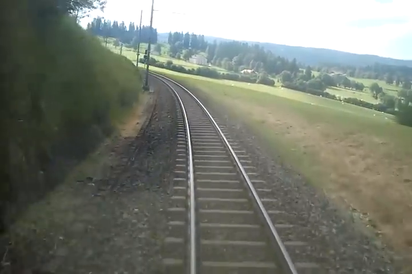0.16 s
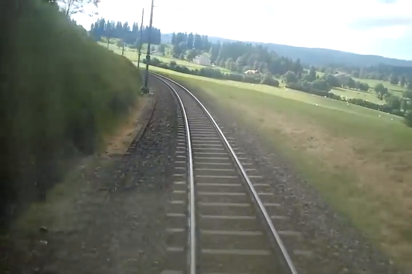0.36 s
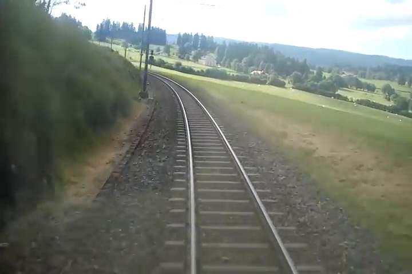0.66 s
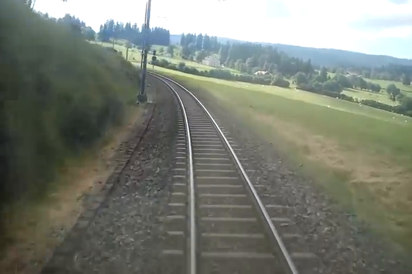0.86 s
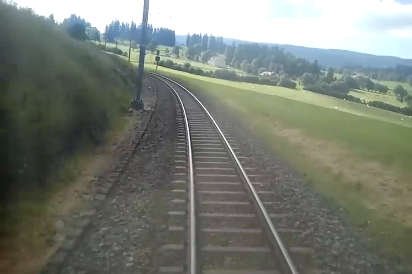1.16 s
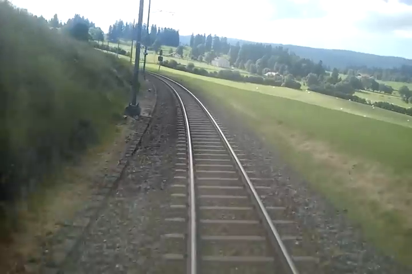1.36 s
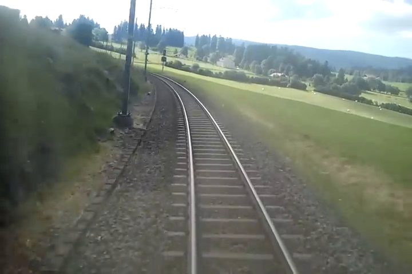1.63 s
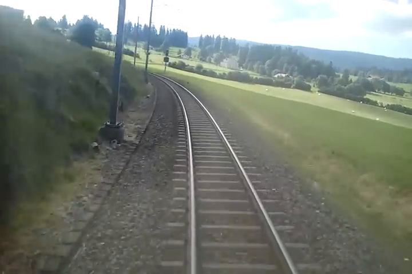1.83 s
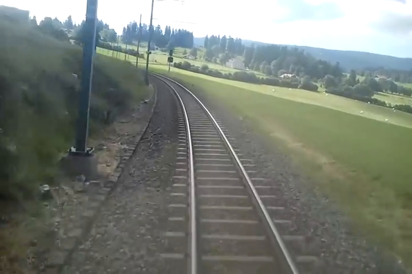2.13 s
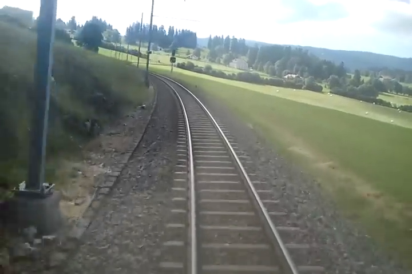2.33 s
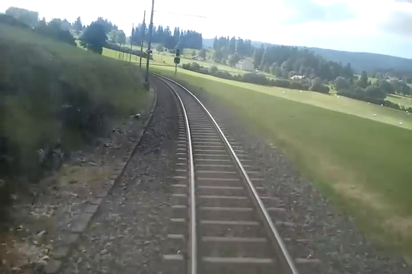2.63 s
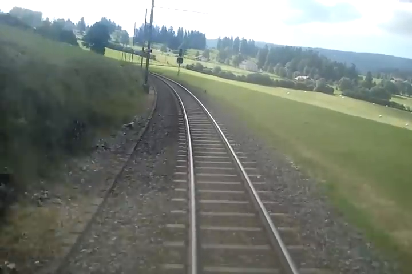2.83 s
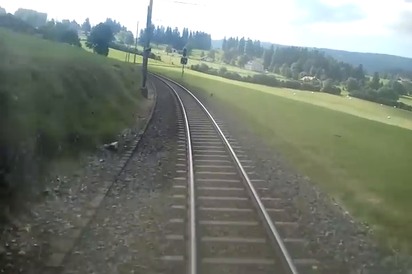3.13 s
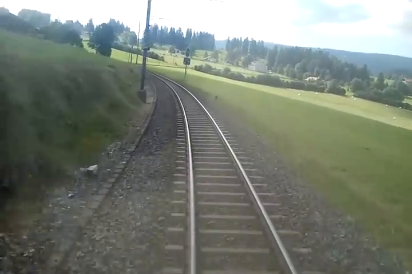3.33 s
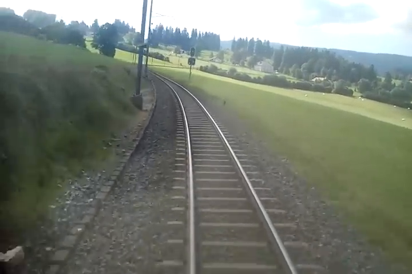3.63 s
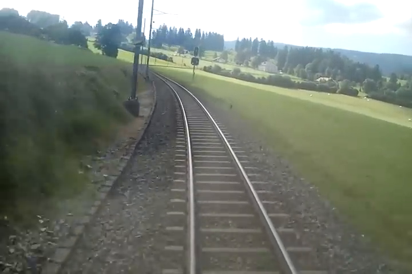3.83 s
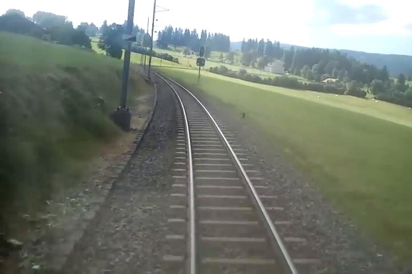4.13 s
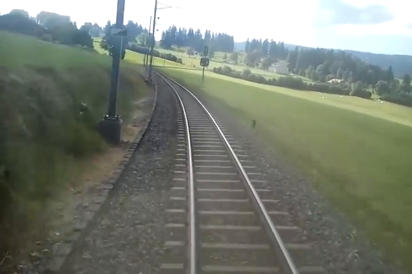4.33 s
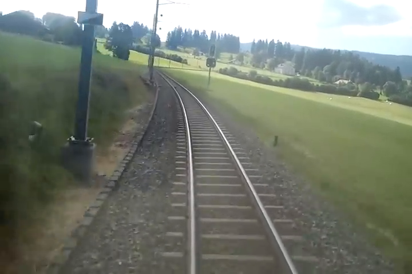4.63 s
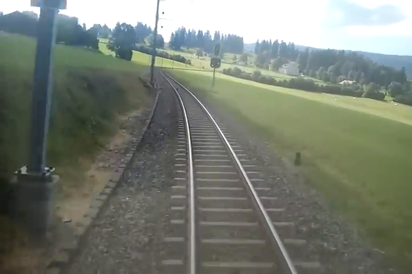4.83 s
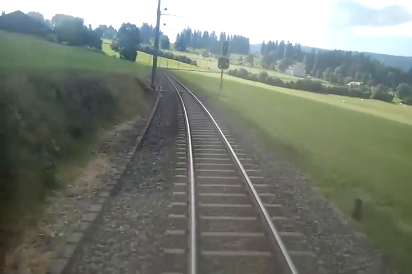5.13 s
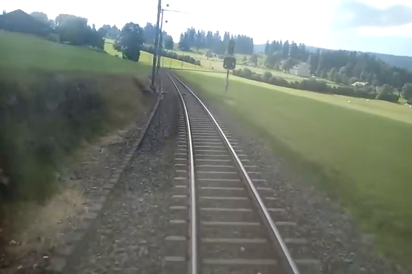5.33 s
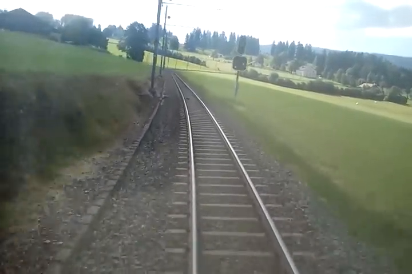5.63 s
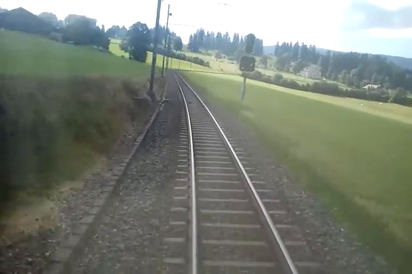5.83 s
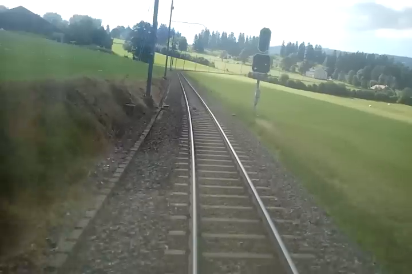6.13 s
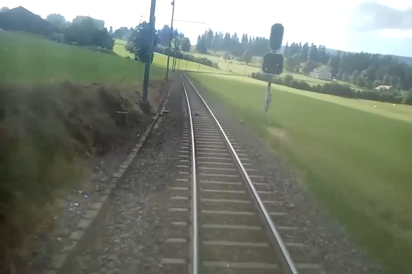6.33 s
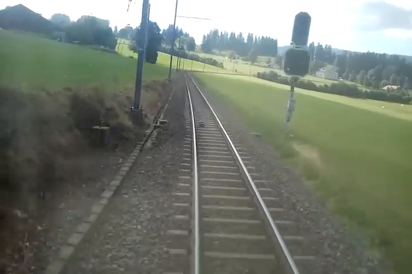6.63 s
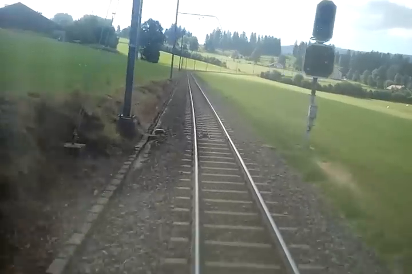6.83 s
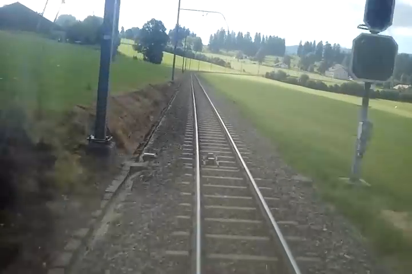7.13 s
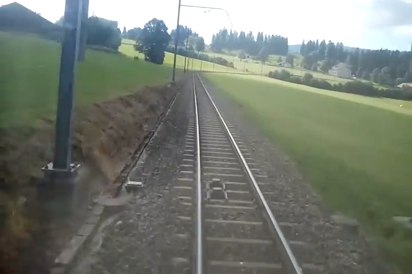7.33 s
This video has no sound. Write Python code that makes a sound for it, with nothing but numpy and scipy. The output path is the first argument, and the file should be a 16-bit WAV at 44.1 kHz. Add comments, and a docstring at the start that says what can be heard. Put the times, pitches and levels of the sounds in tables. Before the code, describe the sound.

In the driver's cab of an electric railcar, low boomy wheel rumble and faint motor hum continue throughout. After a few light flange scrapes, one loud, high air whistle sounds for under a second and echoes off the surroundings. Then the curve brings steely hissing, flickering high squeals, a metallic knock, one strong piercing squeal with a burst of air, and low groaning grinds. Microphone inside the cab, centred.

```python
"""Wheel rumble through the car body is heard first, in the cab of an electric railcar rounding a curve.
Filtered noise and two hum tones make it; noise rubs for the flanges, and wavering tones squeal for the wheels.
The air whistle, a gliding harmonic tone, blows once, and reflectors return it Doppler-shifted, mostly upward.
In the curve two low wheel modes groan, the rail is struck once, and a shaped noise burst lets off air.
"""
import sys
import numpy as np
from scipy import signal
from scipy.fft import rfft, irfft, next_fast_len
from scipy.io import wavfile
from scipy.ndimage import uniform_filter1d

SR = 44100
rng = np.random.default_rng(int(sys.argv[2]) if len(sys.argv) > 2 else 0)


def put_to_file(sound):
    """Save the sound as 16-bit audio at rate SR, in the file named by the first command-line argument."""
    columns = np.atleast_2d(sound).T  # one column per channel
    safe = np.clip(columns, -1, 1)
    whole_steps = np.round(safe * 32767)
    wavfile.write(sys.argv[1], SR, whole_steps.astype(np.int16))


N = 329427
TIME = np.arange(N) / SR
CUTOFF_HZ = 15730   # upper limit of the sound
SPEED_M_S, SOUND_M_S = 13, 343   # speed of the railcar; speed of sound


def amp(db):
    """Logarithmic level: dB to amplitude gain."""
    return 10 ** (np.asarray(db) / 20)


def rms_one(x):
    """Normalisation: scale to rms 1."""
    return x / np.sqrt(np.mean(x ** 2) + 1e-20)


def in_time(rows):
    """Linear interpolation: the columns of a curve at every sample."""
    times, *columns = np.transpose(rows)
    return [np.interp(TIME, times, column) for column in columns]


def while_on(rows, fade_s):
    """Gating: 1 during a curve, fading linearly to 0 outside it."""
    inside_s = np.minimum(TIME - rows[0][0], rows[-1][0] - TIME)
    return np.clip(inside_s / fade_s + 1, 0, 1)


def drift(rate_hz, size=N):
    """Low-pass random process: noise through two equal poles at rate_hz; spread 1."""
    r = np.exp(-16 * np.pi * rate_hz / SR)   # run at an eighth of the sample rate
    noise = rng.standard_normal(size // 8 + 3002)
    slow = signal.lfilter([1], [1, -2 * r, r * r], noise)[3000:]   # drop the start-up
    return np.interp(np.arange(size) / 8, np.arange(len(slow)), rms_one(slow))


def coloured(spectrum, lifts=()):
    """Spectral shaping: noise with a given spectrum and resonant lifts; rms 1."""
    size = next_fast_len(N)
    hz = np.arange(1, size // 2 + 2) * SR / size
    points = np.array(spectrum)
    db = np.interp(np.log(hz), np.log(points[:, 0]), points[:, 1], left=-120, right=-120)
    for centre, width, lift_db in lifts:
        db = db + lift_db / (1 + (2 * (hz - centre) / width) ** 2)
    return rms_one(irfft(rfft(rng.standard_normal(size)) * amp(db), size)[:N])


def resonate(x, hz, width_hz):
    """Damped resonance: one pole pair, gain 1 at its peak."""
    r = np.exp(-np.pi * width_hz / SR)
    poles = [1, -2 * r * np.cos(2 * np.pi * hz / SR), r * r]
    return signal.lfilter([(1 - r * r) / 2, 0, (r * r - 1) / 2], poles, x)


def band(x, low_hz, high_hz):
    """Band-pass filtering: one band of a sound; rms 1."""
    sos = signal.butter(3, [low_hz, high_hz], "band", fs=SR, output="sos")
    return rms_one(signal.sosfilt(sos, x))


def bursts(starts, holds, peaks_db, rise_db_s, fall_db_s):
    """Exponential growth and decay: dB ramps rise to each start, hold and fall; the loudest counts."""
    coarse = TIME[::16]
    level_db = np.full(len(coarse), -200.0)
    for start, hold, peak_db, rise in np.broadcast(starts, holds, peaks_db, rise_db_s):
        before_s = np.maximum(start - coarse, 0)
        after_s = np.maximum(coarse - start - hold, 0)
        level_db = np.maximum(level_db, peak_db - rise * before_s - fall_db_s * after_s)
    return np.interp(TIME, coarse, level_db)


# wheels on rail: (time [s], floor boom level [dB], middle rumble level [dB], upper rumble level [dB])
ROLLING = [(0.0, -8.5, -24, -30.5), (0.04, -16.5, -19, -29), (1.08, -17, -20, -31.5),
           (1.48, -12.5, -17.5, -28), (1.62, -15.5, -20.5, -32), (2.99, -17.5, -18, -30),
           (3.1, -18.5, -23, -30), (3.47, -14, -17.5, -29), (3.79, -16.5, -22, -31.5),
           (4.12, -17, -17.5, -28), (4.24, -19, -18.5, -29), (6.12, -19, -20, -31.5),
           (7.39, -16, -17, -28.5), (7.47, -53, -16, -29)]
# spectrum of the rumble: (frequency [Hz], relative density [dB per Hz])
RUMBLE_SPECTRUM = [(15, -27.5), (25, -14), (154, -12.5), (171, -11), (231, -5.5), (257, -3.5), (296, 0),
                   (372, -8.5), (400, -5.5), (521, -6.5), (559, -5.5), (644, -16), (1070, -20),
                   (1170, -31.5), (1700, -45.5), (2210, -42), (3740, -120)]
# car body resonances: (frequency [Hz], width [Hz], lift [dB])
BODY_MODES = [(43.4, 4.9, 5), (269.6, 20, 8), (324, 170, 4), (397.4, 8, 6.5), (558, 67, 3), (772, 14, 4)]
# deepest rumble: (time [s], level [dB])
DEEP_LEVEL = [(0, -28.5), (1.2, -30.5), (1.7, -27), (4.1, -28), (4.7, -29.5), (6.4, -31), (7.47, -25.5)]
# motor and gear hum: (frequency [Hz], mean level [dB])
HUM = [(182.6, -33), (43.3, -52.5)]
# spectrum of the tread on the rail: (frequency [Hz], relative density [dB per Hz])
TREAD_SPECTRUM = [(710, -33.5), (1200, 11.5), (1320, 3), (1980, -3.5), (2490, -10.5), (2700, -31),
                  (4370, -2.5), (5060, -39.5), (7000, -34.5), (9100, -64), (15400, -120)]
TREAD_HISS_DB = -41.5


def rumble():
    """Forced vibration: rail roughness shakes the car body in bands; the drive hums, the treads hiss."""
    boom_db, middle_db, upper_db = in_time(ROLLING)
    body = coloured(RUMBLE_SPECTRUM, BODY_MODES)
    low = amp(in_time(DEEP_LEVEL)[0]) * band(body, 22, 188.4)
    boom = amp(boom_db + 0.97 * drift(3.9)) * band(body, 211.4, 329.0)
    middle = amp(middle_db + 1.25 * drift(4.5)) * band(body, 400, 700)
    upper = amp(upper_db) * band(body, 802, 2700)
    hum = 0
    for hz, db in HUM:
        phase = 2 * np.pi * np.cumsum(hz + 0.65 * drift(2.1)) / SR
        hum = hum + amp(db + 3.5 * drift(8.3)) * np.sin(phase)
    tread_hiss = amp(TREAD_HISS_DB) * coloured(TREAD_SPECTRUM)
    return low + boom + middle + upper + hum + tread_hiss


# steady pressure of the flanges, light, then firm in the curve: (time [s], force level [dB])
RUBBING = [(0, -53.5), (0.7, -59), (1.3, -54), (1.5, -57.5), (2.3, -54.5), (3.08, -52), (3.45, -42.5),
           (4.1, -42.5), (4.7, -42.5), (4.85, -41.5), (5.34, -42), (5.44, -49), (5.56, -41), (6.15, -41.5),
           (6.2, -38), (6.6, -41.5), (7.17, -40.5), (7.215, -44.5), (7.25, -45), (7.47, -43)]
# moments of harder bite:
# (time [s], hold [s], rise [dB/s], force level [dB], sizzle level [dB], grind level [dB])
BITES = [(.27, 0.05, 300, -51, -54, -41), (0.668, 0.042, 298, -51.5, -78, -44),
         (0.887, 0.024, 298, -51.5, -69, -44), (2.127, 0.035, 297, -53, -79, -39.5),
         (0.462, 0.087, 248, -43.5, -42.5, -44), (1.306, 0.046, 155, -50, -55, -42),
         (2.754, 0.057, 200, -40, -45, -38), (3.223, 0.026, 400, -44.5, -39.5, -45),
         (3.463, 0.036, 296, -41.5, -44, -41), (4.095, 0.067, 400, -39.5, -37.5, -40),
         (4.345, 0.027, 2000, -35.5, -25.5, -33.5), (5.263, 0.099, 300, -41, -44, -39),
         (5.69, 0.097, 300, -36, -28.5, -28.5), (7, 0.036, 600, -39.5, -29, -33),
         (7.095, 0.049, 400, -37.5, -30.5, -32), (7.25, 0.067, 700, -40, -32, -35.5),
         (7.347, 0.095, 300, -40, -32.5, -29.5)]
# spectra of hiss, sizzle and grind: (frequency [Hz], relative density [dB per Hz])
RUB_SPECTRUM = [(650, -16), (1100, -4.5), (1630, -30), (1830, -8), (2130, -8.5), (2770, -2), (3510, -2.5),
                (4650, 0), (9000, -25), (11700, -72), (19800, -120)]
SIZZLE_SPECTRUM = [(4000, -13), (6000, 0.5), (8500, -3.5), (10500, -9.5), (13000, -13.5), (15900, -52.5)]
GRIND_SPECTRUM = [(900, -20.5), (1200, 3.5), (1800, -5), (2500, -8.5), (3500, -24)]
# wheel modes that the rubbing rings: (frequency [Hz], width [Hz], level before the contact gain [dB])
WHEEL_MODES = [(830, 30, -6), (1020, 40, -8), (1850, 50, -16), (2050, 40, -18), (2729, 30, -11),
               (3315, 60, -6.5), (3763, 50, -15), (4690, 60, -8), (4760, 40, -9), (4940, 200, -7),
               (5690, 40, -10), (5800, 500, -6), (7908, 40, -17), (8344, 40, -17)]
FIRM_DB, FORCE_WANDER_DB = -43, 1.5   # usual force in the curve; its random wander
BITE_FALL_DB_S = 216.5
HISS_DB = 8   # hiss above the force
SIZZLE_DB, SIZZLE_GROWTH = -41.5, 1.84   # at the usual force; dB gained for each dB of force
GRIND_DB, GRIND_GROWTH = -51, 3.5   # likewise
TOP_HZ, TOP_GROWTH = 10500, .9   # above this pitch: extra fade in dB for each dB of sizzle below -38 dB
SCRAPE_DB = .8   # fast roughness of the sliding contact
KNOCK_S = 4.354   # the flange strikes the rail once
KNOCK_DB = 32   # height of the strike above the rms of the noise that drives the wheel modes


def flanges():
    """Sliding friction: steel hisses, grinds, rings the wheel modes and sizzles when it bites harder."""
    steady_db, = in_time(RUBBING)
    starts, holds, rises, *peaks = np.transpose(BITES)
    bite_db, bright_db, dull_db = [bursts(starts, holds, db, rises, BITE_FALL_DB_S) for db in peaks]
    rub_db = np.maximum(steady_db + FORCE_WANDER_DB * drift(8.1), bite_db)
    sizzle_db = np.maximum(SIZZLE_DB + SIZZLE_GROWTH * (steady_db - FIRM_DB), bright_db)
    grind_db = np.maximum(GRIND_DB + GRIND_GROWTH * (steady_db - FIRM_DB), dull_db)

    flutter = amp(.7 * drift(10) + SCRAPE_DB * drift(45))
    hiss = amp(HISS_DB) * flutter * coloured(RUB_SPECTRUM)

    fizz = coloured(SIZZLE_SPECTRUM)
    lower = signal.sosfiltfilt(signal.butter(4, TOP_HZ, fs=SR, output="sos"), fizz)
    top_gain = amp(TOP_GROWTH * np.minimum(sizzle_db + 38, 0))
    sizzle = amp(sizzle_db + 2.4 * drift(12)) * (lower + top_gain * (fizz - lower))
    grind = amp(grind_db + SCRAPE_DB * drift(30)) * coloured(GRIND_SPECTRUM)

    contact = rng.standard_normal(N)
    contact[round(KNOCK_S * SR)] = amp(KNOCK_DB)
    rings = 0
    for hz, width, db in WHEEL_MODES:   # each mode is caught and let go on its own
        rings = rings + amp(db + 2.0 * drift(4.6)) * rms_one(resonate(contact, hz, width))
    # firm contact rings the wheel more
    ring_gain = amp(1.9 * (uniform_filter1d(rub_db, size=3000) + 39.0))
    return amp(rub_db) * (hiss + ring_gain * rings) + sizzle + grind


OCTAVE_DB = -31   # octave relative to the tone


def wavering(hz, level_db, flicker_db):
    """Stick-slip oscillation: a tone with its octave, unsteady in pitch and strength."""
    phase = 2 * np.pi * np.cumsum(hz * (1 + 0.000914 * drift(22.9))) / SR
    octave = amp(OCTAVE_DB) * np.sin(2 * phase) * (2 * hz < CUTOFF_HZ)
    return amp(level_db + flicker_db * drift(31)) * (np.sin(phase) + octave)


# wheel modes that lock into a tone, one row each: (frequency [Hz], close partner [Hz] if any)
SQUEAL_MODES = [(4760,), (5766,), (2729,), (3763,), (6665, 6756), (7634, 7725), (2045,), (1850,),
                (8565, 8662), (9582,), (4685,), (5690,)]
# squeals of each mode in turn: (time [s], hold [s], level before flicker [dB])
SQUEALS = [
    [(0.46, 0.07, -41), (2.755, 0.03, -44), (3.42, 0.24, -35), (3.66, 0.067, -28), (3.83, 0.051, -39),
     (4.15, .04, -32), (4.6, 0.091, -39), (4.82, .06, -27), (4.92, 0.035, -32), (5.14, 0.063, -31),
     (5.56, 0.044, -28), (5.75, .03, -25), (5.81, 0.16, -16.5), (6.03, 0.069, -28.5), (6.29, 0.038, -20.5),
     (6.68, 0.082, -34), (6.88, 0.034, -28)],
    [(0.49, 0.07, -50), (2.76, 0.036, -48), (3.42, 0.11, -41), (3.6, 0.033, -39), (3.72, .08, -44),
     (4.15, 0.11, -23), (4.3, 0.14, -27), (4.51, 0.053, -25.5), (4.6, 0.038, -32), (4.89, 0.14, -22),
     (5.07, 0.091, -22.5), (5.19, 0.065, -28.5), (6.075, 0.051, -31.5)],
    [(0.465, 0.059, -41), (2.765, 0.043, -43), (3.24, .03, -41), (3.44, 0.087, -39), (3.69, 0.054, -34),
     (4.0, 0.071, -37.5), (5.14, 0.064, -37.5), (6.2, 0.11, -39), (6.49, 0.045, -37.5), (6.72, 0.029, -39),
     (6.84, 0.051, -36.5), (4.8, 0.12, -42)],
    [(3.58, .1, -43), (4.434, 0.25, -37.5), (5.254, 0.066, -43), (6.89, .05, -39), (4.79, 0.11, -37.5),
     (5.72, 0.064, -33)],
    [(.45, .07, -51), (3.62, 0.069, -41), (4.04, 0.21, -43), (4.38, 0.095, -43), (4.6, 0.083, -43),
     (4.77, 0.08, -37.5), (4.92, 0.077, -37), (5.2, .06, -48), (5.3, 0.063, -41), (6.2, 0.21, -37)],
    [(.46, 0.076, -50), (3.33, .1, -44.5), (3.64, 0.094, -43), (4.0, .17, -47), (4.8, .2, -45),
     (5.12, 0.16, -46), (5.8, .15, -43), (4.55, 0.092, -46), (6.2, 0.13, -36)],
    [(.68, 0.027, -47), (3.49, 0.027, -40), (4.268, .032, -39), (4.8, .04, -44), (5.24, .05, -42),
     (5.49, .02, -45)],
    [(.46, 0.061, -44), (3.3, 0.36, -46.5), (3.8, 0.3, -48), (4.15, 0.12, -44), (4.55, 0.54, -50),
     (6.85, .1, -43)],
    [(.47, 0.066, -55), (3.5, 0.13, -50), (4.14, .1, -55), (4.78, 0.11, -50), (5.15, .2, -60)],
    [(4.05, .1, -57), (4.9, .2, -57)],
    [(.47, .07, -47), (2.76, .05, -45), (3.42, .08, -34), (3.6, .1, -35), (3.8, 0.098, -39),
     (4.6, 0.086, -41), (4.82, .06, -31), (4.98, .05, -43), (5.21, .07, -38), (6.68, 0.055, -42)],
    [(.48, 0.073, -50), (3.5, .08, -43), (3.61, .04, -33), (3.72, .09, -44), (3.85, .03, -52),
     (4.17, .2, -34), (4.52, 0.14, -32), (4.98, 0.053, -39), (5.12, 0.1, -37), (6.08, 0.065, -34)],
]
# faint tone of each mode between squeals: (level relative to the usual force [dB])
IDLE_LEVELS = [-5, -9, -7, -9, -12, -10, -22, -14, -13, -15, -7, -10]
IDLE_GROWTH = 2.2   # dB it gains for each dB of force
SQUEAL_RISE_DB_S, SQUEAL_FALL_DB_S = 282, 241
RETURNS_DB = -5.5   # trackside returns relative to the smoothed tone, at the lock level
LOCK_DB, LOCK_SHARE = -26, .3   # level of a firm lock; share of a drop below it that the skirt regains
LOOSE_FLICKER = .15   # extra flicker in dB for each dB below a firm lock
SIDE_COSINE = .77   # returns come from the side of the track


def squeal():
    """Friction-driven modes: wheel tones, with Doppler-shifted trackside returns as a skirt round each."""
    out = 0
    spread = 2 * SPEED_M_S / SOUND_M_S * SIDE_COSINE   # shifted up ahead, down behind
    force_db, = in_time(RUBBING)
    for modes, idle_offset_db, rows in zip(SQUEAL_MODES, IDLE_LEVELS, SQUEALS):
        # the idle tone dies fast as the flange lets go
        idle_db = FIRM_DB + idle_offset_db + IDLE_GROWTH * (force_db - FIRM_DB) + 2.4 * drift(4.6)
        burst_db = bursts(*np.transpose(rows), SQUEAL_RISE_DB_S, SQUEAL_FALL_DB_S)
        level_db = np.maximum(idle_db, burst_db)

        hz = modes[0]
        skirt = coloured([(hz * (1 - 2 * spread), -20), (hz * (1 - spread), -11),
                          (hz * (1 - 0.6 * spread), -2.5), (hz, 0), (hz * (1 + .65 * spread), -1.5),
                          (hz * (1 + spread), -10), (hz * (1 + 2 * spread), -20)])
        # many paths even the level out
        returns_db = uniform_filter1d(level_db, size=2500) + RETURNS_DB
        returns_db = returns_db + LOCK_SHARE * np.clip(LOCK_DB - level_db, -9, 14)
        flicker_db = 1.4 + LOOSE_FLICKER * np.clip(LOCK_DB - level_db, 0, 14)
        tones = sum(wavering(mode_hz, level_db, flicker_db) for mode_hz in modes)
        out = out + amp(returns_db) * skirt + tones
    return out


# whistle, surging as the valve opens and as it shuts:
# (time [s], pitch [Hz], fundamental rms level [dB], overtone gain [dB])
WHISTLE = [(2.27, 1165, -40, -71), (2.296, 1147, -29, -56), (2.308, 1126, -12.5, -46),
           (2.322, 1184, -7.5, -40), (2.354, 1210, -5, -30), (2.378, 1196, -13, -36),
           (2.39, 1215, -16, -34), (2.54, 1209, -15.5, -34), (2.58, 1213, -11, -32.5),
           (2.69, 1209, -11, -37), (2.75, 1211, -21, -36), (2.8, 1206, -15.5, -38), (2.948, 1216, -16, -36),
           (2.975, 1208, -9.5, -38), (2.996, 1202, -2.5, -51), (3.003, 1223, -15, -51),
           (3.012, 1175, -6.5, -54), (3.03, 1200, -27, -59), (3.12, 1205, -41, -73)]
# overtones of the direct sound: (multiple of the pitch, level relative to the overtone gain [dB])
OVERTONES = [(2, -9), (3, -0.5), (4, -17), (5, -13), (6, -25), (7, -19)]
# spectrum of air past the whistle lip: (frequency [Hz], relative density [dB per Hz])
BREATH_SPECTRUM = [(3000, -23), (4500, -4), (9000, -3), (11000, -23)]
# returned sound: (multiple of the pitch, relative level [dB], angle cosine of the strongest reflector,
# its lift [dB], lasting share of its return)
ECHO_ORDERS = [(1, -5, 0.2, 6, 0), (2, -30, 0.75, 6, .4), (3, -26, 0.7, 17, 1.2), (4, -36, 0.52, 18.5, 1.6),
               (5, -29.5, 0.54, 9, 0), (6, -39, 0.68, 12, .6), (7, -42, 0.61, 14, .5), (8, -48, 0.55, 6, 0)]
BLOW_DB = -15.5   # drive of the returns
ECHO_T60_S = 0.2   # time for the near returns to die by 60 dB


def whistle():
    """Doppler effect: reflectors ahead return the blow raised by up to 2 v/c; those behind, lowered."""
    part = slice(int(2.2 * SR), int(3.5 * SR))
    pitch_hz, level_db, overtone_db = [column[part] for column in in_time(WHISTLE)]
    on = while_on(WHISTLE, 0.0061)[part]
    phase = 2 * np.pi * np.cumsum(pitch_hz) / SR
    overtones = sum(amp(db) * np.sin(k * phase) for k, db in OVERTONES)
    direct = np.sqrt(2) * on * (amp(level_db) * np.sin(phase) + amp(overtone_db) * overtones)

    # the returns build up after the start and die after the end
    r = amp(-60 / (ECHO_T60_S * SR))
    blowing = on * (TIME[part] > 2.33) * (TIME[part] < 3.0)
    near = amp(BLOW_DB) * signal.lfilter([1 - r], [1, -r], blowing)
    far = amp(-30.0) * signal.lfilter([1 - r ** 0.15], [1, -r ** 0.26], near)   # far slopes answer longer
    swell = near + far
    total = direct + amp(-26.5) * swell * coloured(BREATH_SPECTRUM)[part]

    for facing in np.linspace(-.63, .95, 21):   # cosine of the angle between track and reflector
        shift = 1 + 2 * SPEED_M_S / SOUND_M_S * facing
        behind_db = 22 * min(facing, 0)   # the car shades what lies behind
        for k, db, best, lift_db, lasting in ECHO_ORDERS:
            # reflectors come and go, faster for short waves
            passing = drift(6 + 3 * k, size=len(on))
            strength = passing + lasting * (abs(facing - best) < .04)
            gain = amp(db - 8.5 + behind_db + lift_db / (1 + ((facing - best) / 0.12) ** 2))
            tone = np.sin(k * shift * phase + rng.uniform(0, 2 * np.pi))
            total = total + gain * swell * strength * tone
    out = np.zeros(N)
    out[part] = total
    return out


# two low wheel modes: (frequency [Hz], width [Hz])
GROAN_MODES = [(825, 81), (1030, 65)]
# swells of each mode in turn: (time [s], hold [s], level [dB])
GROANS = [
    [(4.28, .05, -38), (5.235, 0.031, -24.5), (5.33, 0.029, -25), (5.93, .05, -30), (6.07, .12, -30),
     (6.28, 0.075, -27.5), (6.555, .03, -32), (6.71, 0.094, -30), (7.07, 0.038, -29), (7.19, 0.067, -30),
     (7.37, .09, -30.5)],
    [(4.12, .05, -35), (4.83, 0.18, -31), (5.16, 0.29, -38), (5.7, 0.18, -32.5), (6.21, 0.29, -34.5)],
]
GROAN_RISE_DB_S, GROAN_FALL_DB_S = 254, 204


def groan():
    """Resonance under random force: rough contact swells in the low wheel modes."""
    out = 0
    for (hz, width), rows in zip(GROAN_MODES, GROANS):
        level_db = bursts(*np.transpose(rows), GROAN_RISE_DB_S, GROAN_FALL_DB_S)
        once = resonate(rng.standard_normal(N), hz, width)
        out = out + amp(level_db) * rms_one(resonate(once, hz, width))   # twice, for steeper sides
    return out


# short rail modes that the knock rings: (frequency [Hz], width [Hz], level at the strike [dB])
KNOCK_RING = [(2850, 170, -33), (3460, 110, -19), (4170, 290, -16), (5000, 400, -23)]


def knock():
    """Free damped vibration: the struck rail rings briefly."""
    after = np.maximum(TIME - KNOCK_S, 0)
    out = 0
    for hz, width, db in KNOCK_RING:
        out = out + amp(db) * np.exp(-np.pi * width * after) * np.sin(2 * np.pi * hz * after)
    return out


# a burst of air: (time [s], level [dB])
AIR_LEVEL = [(6.165, -75), (6.18, -25), (6.3, -28), (6.5, -32.5), (6.72, -37), (6.8, -65)]
# spectrum of the jet: (frequency [Hz], relative density [dB per Hz])
AIR_SPECTRUM = [(2940, -38), (5000, -19), (6490, 2), (7040, -6), (8360, 3), (9960, -9), (12600, -5),
                (13800, -15), (15600, -7)]


def air():
    """Jet noise: compressed air let off under the floor."""
    level_db = in_time(AIR_LEVEL)[0] + 1.0 * drift(9.7)
    return amp(level_db) * while_on(AIR_LEVEL, .003) * coloured(AIR_SPECTRUM)


def scene():
    """Superposition: all sources add and reach both channels alike, from the middle."""
    total = rumble() + flanges() + squeal() + whistle() + groan() + knock() + air()
    return np.tile(total, (2, 1))


def record(dry):
    """Saturation and low-pass filtering: peaks bend over near full scale, the top is cut."""
    bent = dry / (1 + np.abs(dry / 1.05) ** 20) ** (1 / 20)
    return signal.sosfilt(signal.ellip(12, .5, 70, CUTOFF_HZ, fs=SR, output="sos"), bent)


dry = scene()
out = record(dry)
put_to_file(out)
```